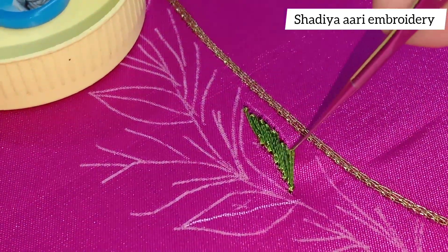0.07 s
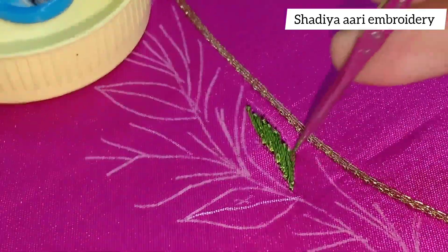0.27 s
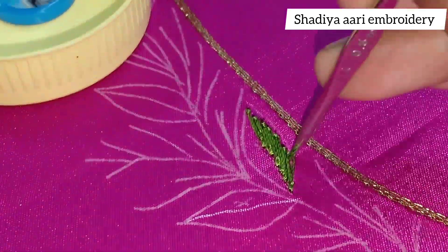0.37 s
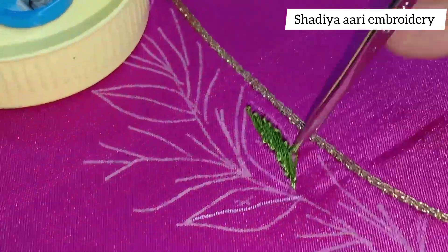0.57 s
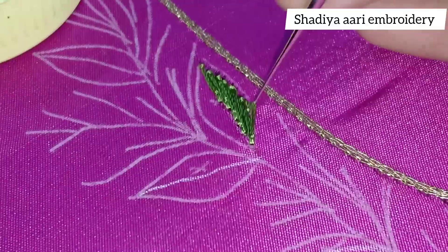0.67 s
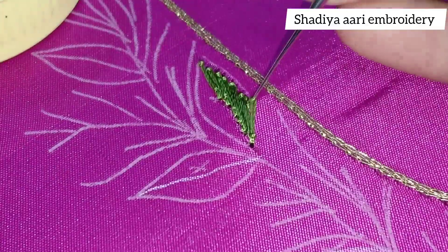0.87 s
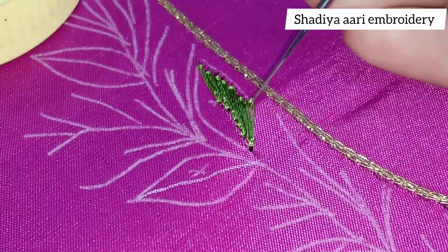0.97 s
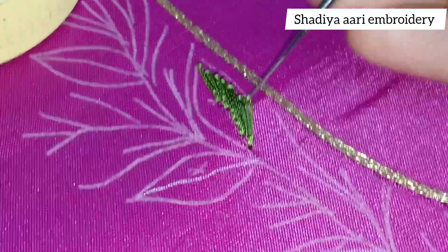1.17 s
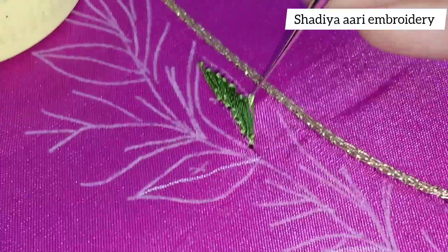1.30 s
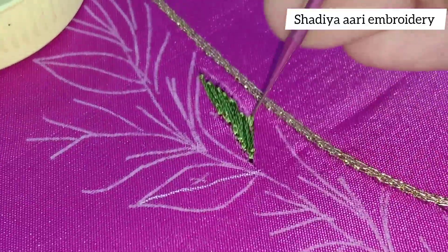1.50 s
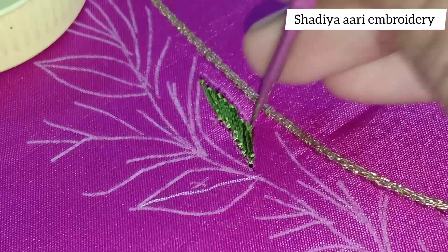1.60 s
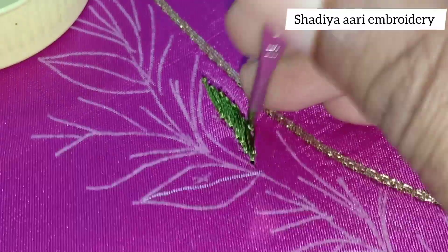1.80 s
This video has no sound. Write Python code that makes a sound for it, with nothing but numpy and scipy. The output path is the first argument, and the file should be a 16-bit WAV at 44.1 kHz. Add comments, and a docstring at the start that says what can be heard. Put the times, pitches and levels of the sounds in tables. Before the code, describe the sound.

A hooked embroidery needle pops through taut fabric close by, a quick cluster of small thuds and bright ticks, then one more tap later. Thread rubs softly and a hand bumps the frame, while distant crows caw outside the quiet room.

```python
"""A hooked embroidery needle works through fabric stretched on a frame, close by in a quiet room.
Each push makes the taut cloth thud like a small damped drum, and the hook snaps free with a bright tick.
Thread rubs through the weave and the hand bumps the frame.
Far outside are bird calls, four hoarse crow-like caws and a thin whistle, over low hum and faint hiss."""
import sys
import numpy as np
from scipy import signal
from scipy.fft import rfft, irfft
from scipy.io import wavfile
from scipy.ndimage import uniform_filter1d

SR = 44100
rng = np.random.default_rng(int(sys.argv[2]) if len(sys.argv) > 2 else 0)


def generate_wav(sig):
    """Save sig (samples, or channels by samples) to the path in sys.argv[1] as 16-bit PCM at SR."""
    pcm = np.round(np.clip(np.atleast_2d(sig).T, -1, 1) * 32767).astype(np.int16)
    wavfile.write(sys.argv[1], SR, pcm)


N = 81585
T = np.arange(N) / SR
ROOM_T60_S, ROOM_DELAY_S = 0.3, 0.0073


def from_db(db):
    """Decibels to gain."""
    return 10 ** (np.asarray(db) / 20)


def rms_one(x):
    """Scale to rms 1."""
    return x / np.sqrt(np.mean(x ** 2) + 1e-20)


def pan(db):
    """Channel gains for a left-minus-right level."""
    return from_db([[db / 2], [-db / 2]])


def lowpass(x, hz, order=2):
    """Butterworth low-pass."""
    return signal.sosfilt(signal.butter(order, min(hz, .45 * SR), fs=SR, output="sos"), x)


def resonate(x, hz, t60_s):
    """One resonance with unity gain at its peak."""
    radius = np.exp(-np.log(1000) / (t60_s * SR))
    feedback = [1, -2 * radius * np.cos(2 * np.pi * hz / SR), radius ** 2]
    return signal.lfilter(np.array([1, 0, -1]) * (1 - radius ** 2) / 2, feedback, x + 1e-18)


def noise(colour, channels=2):
    """Independent noise per channel, rms 1; colour gives the gain at each frequency."""
    hz = np.arange(N // 2 + 1) * SR / N + 1
    white = rng.standard_normal((channels, N))
    return rms_one(irfft(rfft(white) * colour(hz), N))


def eq_curve(points):
    """Noise colour drawn through (freq_hz, gain_db) points."""
    hz, db = np.transpose(points)
    return lambda f: from_db(np.interp(np.log(f), np.log(hz), db))


def band(hz, half_width_hz):
    """Colour of a single peak."""
    return lambda f: 1 / (1 + ((f - hz) / half_width_hz) ** 2)


def wander(per_s):
    """Slow random modulation, different at each ear."""
    steps = rng.standard_normal((2, 400))
    return np.array([np.interp(T * per_s, np.arange(len(row)), row) for row in steps])


def swell(start_s, attack_s, decay_s):
    """Envelope with a linear attack and an exponential decay."""
    age = T - start_s
    return np.clip(age / attack_s, 0, 1) * np.exp(-np.maximum(age - attack_s, 0) / decay_s)


def click(start_s, db):
    """One impulse."""
    return from_db(db) * (np.arange(N) == int(start_s * SR))


def ring(force, modes):
    """A force sets a bank of modes ringing, each with its own level left and right."""
    return sum(from_db([[left], [right]]) * resonate(force, hz, t60) for hz, t60, left, right in modes)


def reverb(x, t60_s, delay_s):
    """A dense dying cloud of reflections, different at each ear."""
    age = np.maximum(T - delay_s, 0)
    tail = rng.standard_normal((2, N)) * from_db(-60 * age / t60_s) * (age > 0)
    tail /= np.sqrt(np.sum(tail ** 2, axis=1, keepdims=True))
    return signal.fftconvolve(x, tail, axes=1)[:, :N]


def in_room(x, early_db, room_db, left_lag_s=0.0002):
    """Direct sound, early scatter from frame and hands, then the room tail."""
    mono = x.mean(axis=0, keepdims=True)
    direct = np.array([np.interp(T - left_lag_s, T, x[0]), x[1]])
    early = from_db(early_db) * reverb(mono, t60_s=0.024, delay_s=0.00053)
    return direct + early + from_db(room_db) * reverb(mono, ROOM_T60_S, ROOM_DELAY_S)


# Tone colour of the room air: freq_hz, gain_db
AIR_EQ = [(25, -1), (45, -12), (100, -7.5), (200, -11.5), (350, -9.5), (600, -10.5), (1100, -14),
          (1700, -14.5), (2500, -14.5), (3700, -26.5), (5300, -24.5), (7000, -32), (9000, -36.5),
          (14000, -34.5), (16000, -45)]
# Fader ride on the hum, which sinks and returns: time_s, boost_db
HUM_RIDE = [(.5, 6), (.95, 0.5), (1.25, 0), (1.5, 8)]


def room_tone(air_db=-62.5, hum_db=-71.5, hum_hz=75):
    """A bed of room air, alike at both ears in the bass, and a wavering low hum."""
    air = noise(eq_curve(AIR_EQ))
    bass = lowpass(air, hz=230, order=1)
    air = air - bass + bass.sum(axis=0) / np.sqrt(2)
    hum = noise(band(hum_hz, half_width_hz=9.8), channels=1)
    boost_db = np.interp(T, *np.transpose(HUM_RIDE))
    return from_db(air_db) * air + from_db(hum_db + boost_db) * hum


# Distant bird calls, four hoarse caws and one thin whistle (the narrowest throat peak):
# start_s, length_s, crest_pulse_hz, throat_hz, throat_half_width_hz, level_db
CALL_CUES = [(-.15, .40, 81, 1723, 246, -61), (.63, .45, 79, 1650, 177, -58.5),
             (0.947, 0.3, 100.6, 2030, 50.4, -64.5), (1.231, .36, 94.8, 1780, 163, -56),
             (1.562, 0.35, 97, 1790, 280, -59.5)]


def bird_calls(attack_s=0.027, release_s=0.078, pitch_sag=0.055, waver_depth=0.87, breath_mix=0.51):
    """A pulse rate arches through each call; its overtones ring in the throat and waver with distance."""
    calls = np.zeros((2, N))
    for start_s, length_s, crest_hz, throat_hz, half_width_hz, db in CALL_CUES:
        progress = np.clip((T - start_s) / length_s, 0, 1)
        pulse_hz = crest_hz * (1 - pitch_sag * (2 * (progress - 0.55)) ** 2)  # crests just past halfway
        phase = 2 * np.pi * np.cumsum(pulse_hz) / SR
        throat = band(throat_hz, half_width_hz)
        tone = 0
        for harmonic in range(13, 25):
            waver = 1 + waver_depth * wander(per_s=16)
            overtone = np.sin(harmonic * phase + rng.uniform(0, 2 * np.pi, (2, 1)))
            tone = tone + throat(harmonic * crest_hz) * waver * overtone
        power = uniform_filter1d(np.mean(tone ** 2, axis=0), size=4000)
        tone = tone / np.sqrt(power + 1e-12)  # even out the level
        voice = rms_one(rms_one(tone) + breath_mix * noise(throat))
        fade_in = np.clip((T - start_s) / attack_s, 0, 1)
        fade_out = np.clip((start_s + length_s - T) / release_s, 0, 1)
        calls += from_db(db) * fade_in * fade_out * voice
    return calls + from_db(-9.5) * reverb(calls, ROOM_T60_S, ROOM_DELAY_S)


# The hand knocks the frame: start_s, attack_s, decay_s, level_db, pitch_hz
BUMP_CUES = [(.325, 0.0094, 0.045, -53.5, 146), (.65, 0.014, 0.028, -61.5, 38),
             (0.794, 0.0069, 0.03, -56.5, 132), (0.906, 0.0082, 0.015, -54.5, 200),
             (1.214, 0.0034, 0.022, -61.5, 129), (1.631, 0.013, 0.054, -63, 131),
             (1.773, 0.038, 0.028, -52.5, 151)]


def hand_bumps(scuff_db=-8.5, pan_db=-9.5):
    """Soft low knocks on the frame with a little scuff of skin on cloth."""
    bumps = 0
    for start_s, attack_s, decay_s, db, pitch_hz in BUMP_CUES:
        scuff = rms_one(lowpass(noise(lambda f: f / (f + pitch_hz)), hz=900))
        knock = noise(band(pitch_hz, half_width_hz=58), channels=1)
        envelope = from_db(db) * swell(start_s, attack_s, decay_s)
        bumps = bumps + envelope * (knock + from_db(scuff_db) * scuff)
    return pan(pan_db) * bumps


# Thread pulls through the cloth: start_s, attack_s, decay_s, level_db
RUB_CUES = [(.279, 0.013, 0.015, -51), (0.345, 0.0063, 0.032, -53), (.57, 0.0075, .02, -65.5),
            (0.649, 0.018, 0.03, -56), (.76, 0.048, 0.047, -69), (1.19, 0.0074, 0.45, -74),
            (1.421, 0.021, 0.021, -59)]
# Tone colour of the rubbing thread: freq_hz, gain_db
THREAD_EQ = [(500, -13), (1500, -4), (2450, 4), (3700, -6.5), (5300, 2), (6500, -3), (8000, -28.5),
             (11500, -21.5), (14000, -30), (16000, -43)]


def thread_rubs(grain_db=2.8, pan_db=-2.5):
    """Grainy friction of thread in the weave."""
    envelope = sum(from_db(db) * swell(start, attack, decay) for start, attack, decay, db in RUB_CUES)
    grain = from_db(grain_db * noise(band(0, half_width_hz=170), channels=1))
    friction = rms_one(grain * noise(eq_curve(THREAD_EQ)))
    return pan(pan_db) * envelope * friction


# The steel point catches and snaps free of the weave: start_s, force_db
SNAP_CUES = [(.2145, -27), (.2381, -14), (.2558, -30), (0.2758, -3.5), (0.2781, -29), (0.2836, -36),
             (0.3016, -18), (.3983, -32), (1.5562, -27.5)]
# The ring of a snap: pitch_hz, t60_s, left_db, right_db
HOOK_MODES = [(1790, 0.0023, 0.5, -6.5), (2410, 0.0074, 8, 15.5), (3240, 0.00073, -23.5, -2.5),
              (5110, 0.0045, -1.5, 12), (6780, 0.0038, -23, -23)]


def hook_snaps(tip_hz=14050, tip_t60_s=0.0013, tip_db=-15.5):
    """The hook slips past taut threads with a bright tick and a thin ring from its steel tip."""
    force = sum(click(start_s, db) for start_s, db in SNAP_CUES)
    tick = lowpass(ring(force, HOOK_MODES), hz=6300, order=4)
    tip = resonate(resonate(force, tip_hz, tip_t60_s), tip_hz, tip_t60_s)
    return in_room(tick + from_db(tip_db) * tip, early_db=-4, room_db=-18.5)


# Needle hits on the cloth: start_s, force_db, brightness_hz, direction (1 pushes, -1 lets go)
TAP_CUES = [(.2145, -12, 2000, 1), (0.2382, -1, 2690, 1), (0.2439, -18, 900, 1), (0.2553, -14, 2460, 1),
            (0.2727, -8.5, 161, 1), (.3290, -31, 1300, 1), (.3315, -32, 1500, -1), (0.3929, -26, 3040, 1),
            (0.3949, -29, 1850, -1), (0.3985, -25, 3000, 1), (0.4003, -17.5, 1580, -1),
            (0.402, -27, 1640, 1), (0.4059, -26.5, 2020, -1), (1.5559, -7.5, 1065, 1),
            (1.5583, -18, 780, -1)]
# Drum-like body of cloth and frame: pitch_hz, t60_s, left_db, right_db
CLOTH_MODES = [(87.7, 0.04, 2.5, 15), (155.4, 0.018, -41, 17.5), (268, 0.025, 8.5, 13),
               (324, 0.071, 15, 17), (444.3, 0.036, 19.5, 18), (553, 0.016, 15, 20.5),
               (717.3, 0.065, 15, 9.5), (813, .05, 7, -2), (947, 0.057, -6, 16), (1259, 0.027, 5.5, 15.5),
               (1392, 0.075, -7, 2.5), (1843, 0.023, 3, 11.5), (2450, 0.02, -23, 2)]
# Notches where the frame barely radiates: centre_hz, width_hz, share_removed
FRAME_NOTCHES = [(1010, 147, 1), (3440, 620, 0.66)]


def needle_taps():
    """The needle pushes and releases the taut cloth, which thuds; each contact has its own brightness."""
    force = sum(direction * lowpass(click(start_s, db), brightness_hz)
                for start_s, db, brightness_hz, direction in TAP_CUES)
    body = lowpass(ring(force, CLOTH_MODES), hz=5130)
    thud = in_room(body, early_db=-3.5, room_db=-14.5)
    for centre_hz, width_hz, share in FRAME_NOTCHES:
        t60_s = np.log(1000) / (np.pi * width_hz)
        thud = thud - share * resonate(thud, centre_hz, t60_s)
    return thud


def scene():
    """Needlework in front, bird calls and room behind."""
    return needle_taps() + hook_snaps() + thread_rubs() + hand_bumps() + bird_calls() + room_tone()


def record(dry, low_cut_hz=52, stopband_hz=17000):
    """The microphone thins the deep bass; a steep filter cuts the very top."""
    low_cut = signal.butter(3, low_cut_hz, "high", fs=SR, output="sos")
    high_cut = signal.cheby2(14, 60, stopband_hz, fs=SR, output="sos")
    return signal.sosfilt(high_cut, signal.sosfilt(low_cut, dry))


dry = scene()
out = record(dry)
generate_wav(out)
```